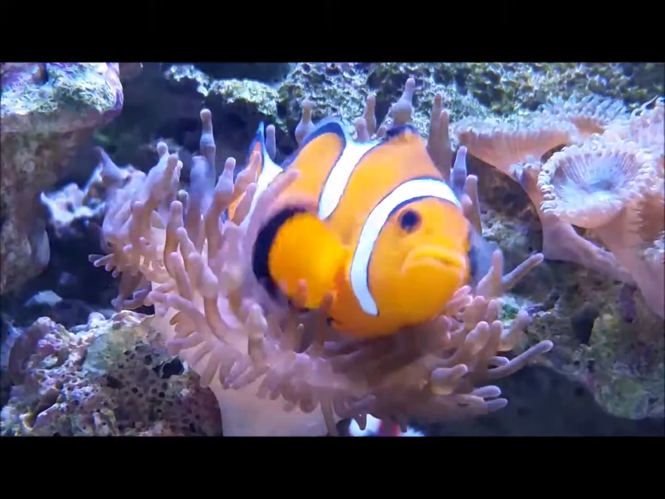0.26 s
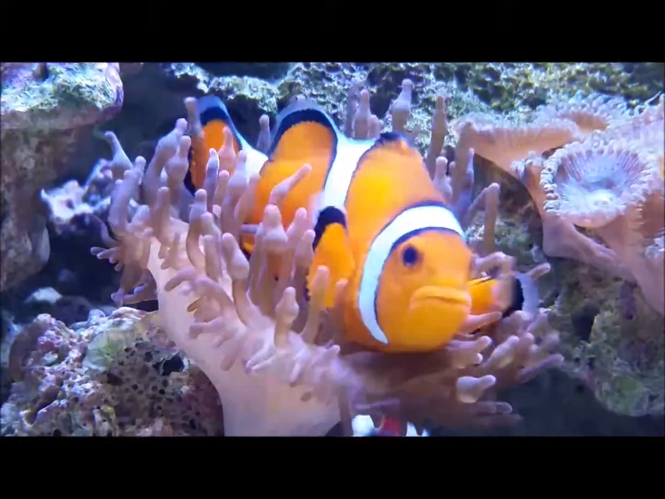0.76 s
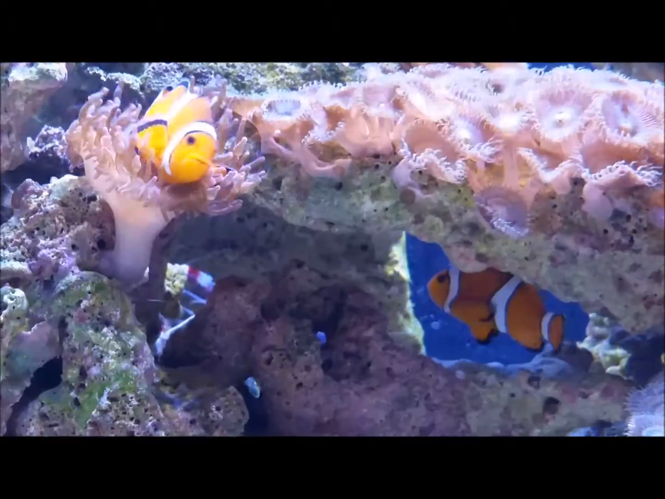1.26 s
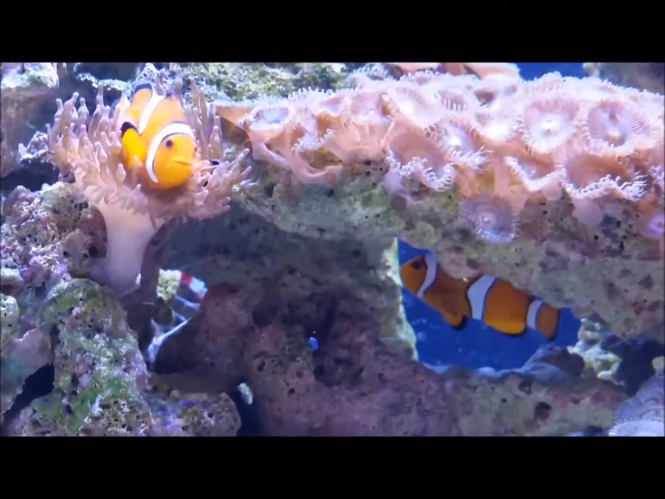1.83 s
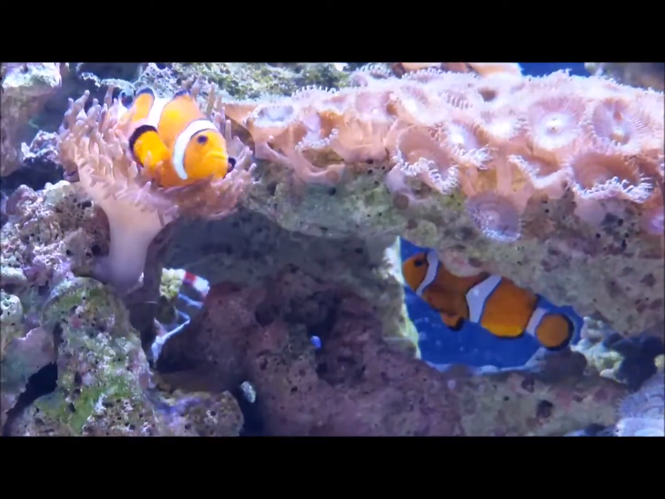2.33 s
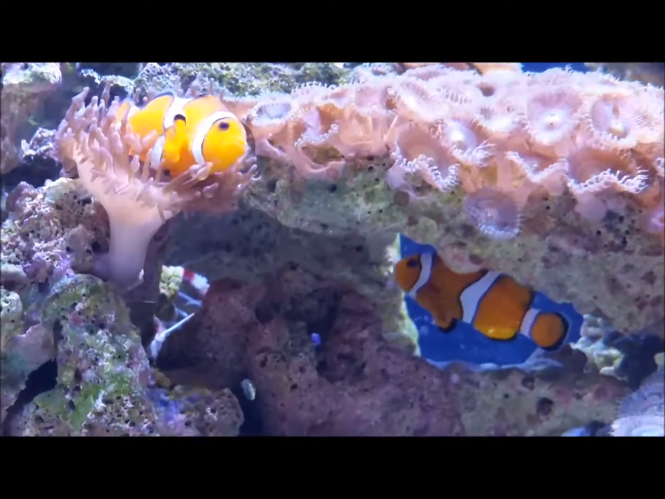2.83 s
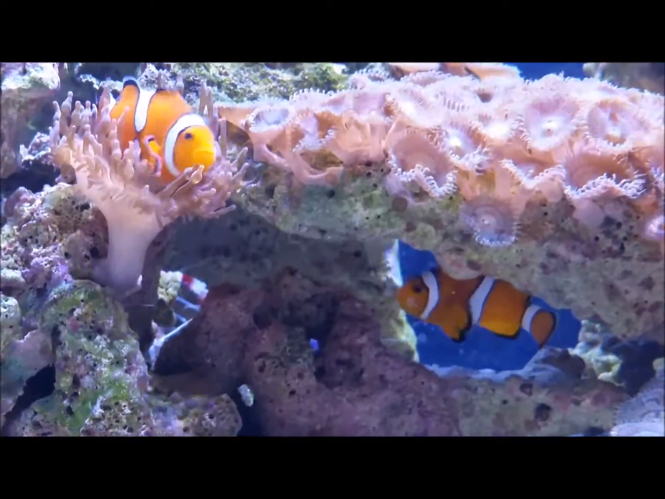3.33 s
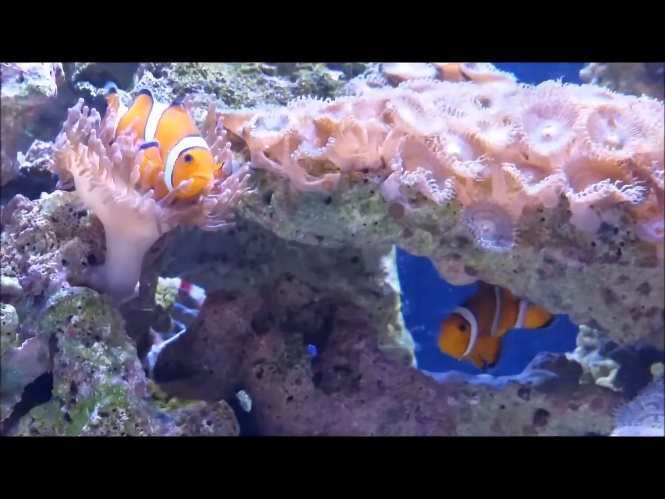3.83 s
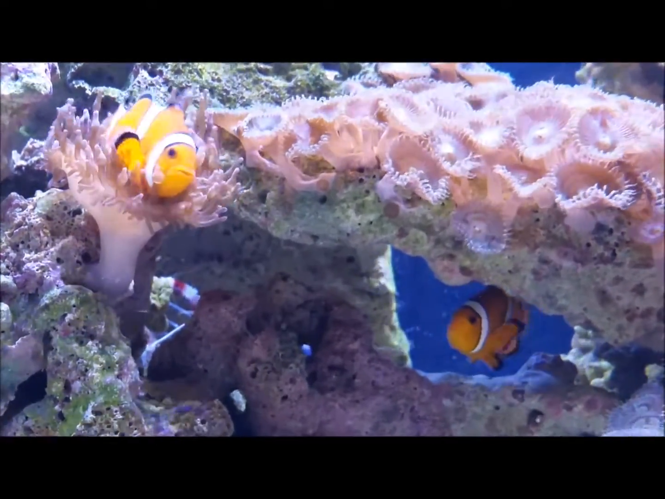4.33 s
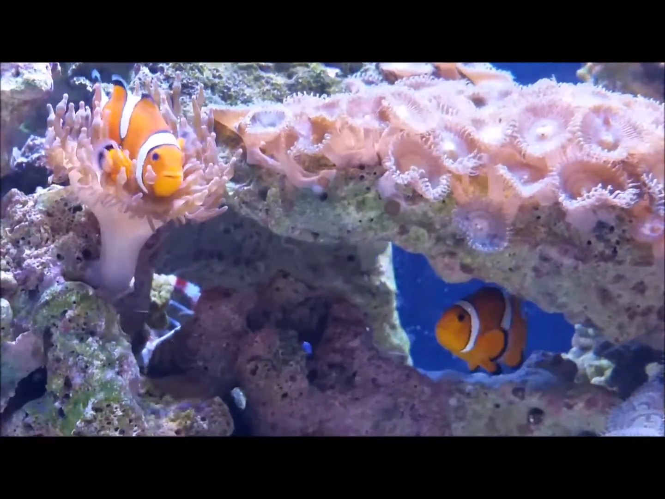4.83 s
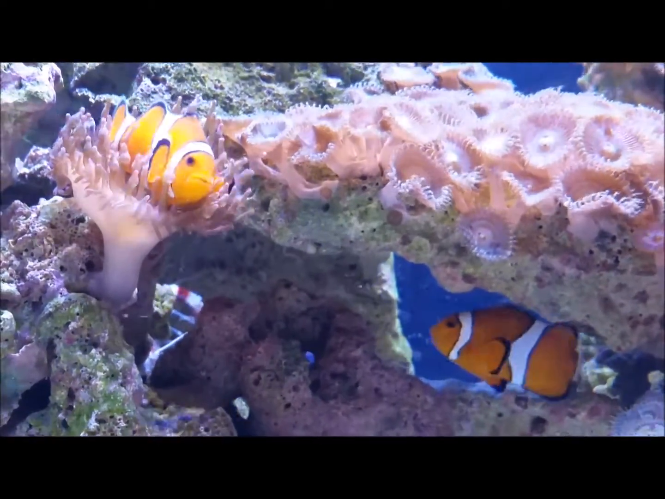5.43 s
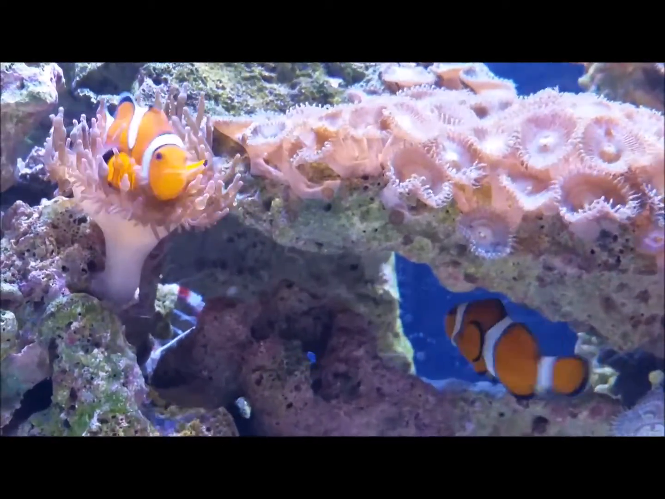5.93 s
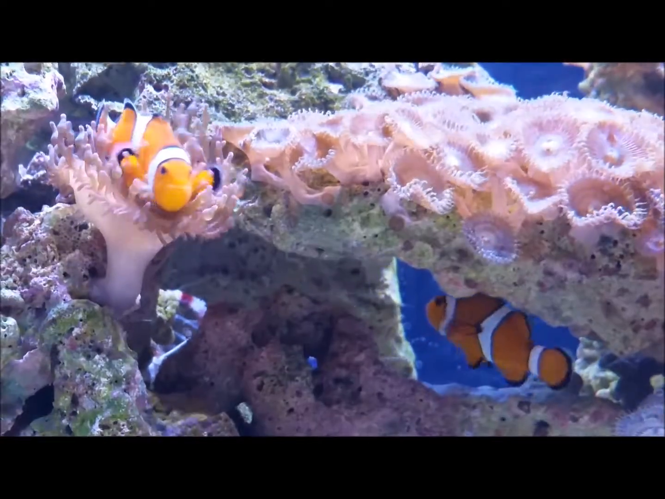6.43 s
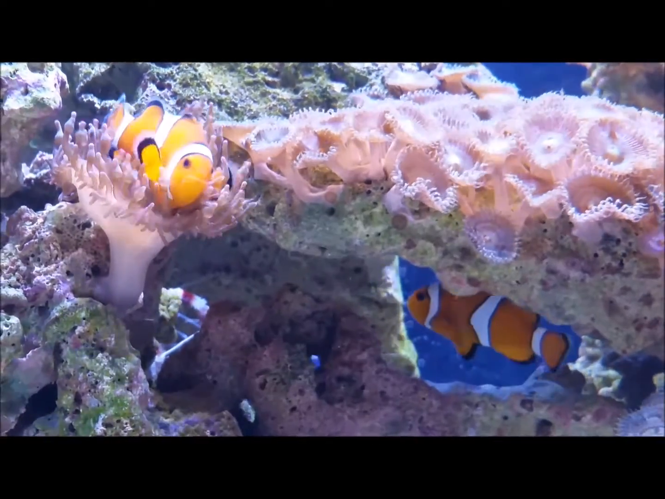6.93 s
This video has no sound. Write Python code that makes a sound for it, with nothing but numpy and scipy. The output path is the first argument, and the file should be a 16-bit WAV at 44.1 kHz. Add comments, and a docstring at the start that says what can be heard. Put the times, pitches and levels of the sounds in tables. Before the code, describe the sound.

Loud low electric pump hum with soft water plops near aquarium glass, then an abrupt drop to a quieter drone with trickling and faint knocks.

```python
"""A reef tank's pump hums indoors: loud close to the glass, then after a hard cut a quiet drone further back.
The hum is a sum of harmonics of the mains; water and air rumble as noise coloured by cabinet and room.
The overflow trickles and surges down its drain as noise shaped by the pipe's air, with pinging bubbles.
Water plops softly near the glass as gliding tones, and resonances swell for a moment now and then.
Damped rings make dry ticks, knocks and a soft bump on the cabinet; filtered noise is the microphone's hiss."""
import sys
import numpy as np
from scipy import signal
from scipy.fft import rfft, irfft
from scipy.io import wavfile
from scipy.ndimage import uniform_filter1d

SR = 44100
rng = np.random.default_rng(int(sys.argv[2]) if len(sys.argv) > 2 else 0)


def output_pcm(signal):
    """Save a mono or channel-first signal as 16-bit PCM at the path in sys.argv[1].

    Samples are clipped to [-1, 1] before scaling.
    """
    pcm = np.clip(np.atleast_2d(signal).T, -1, 1) * 32767
    wavfile.write(sys.argv[1], SR, np.round(pcm).astype(np.int16))


N = 316638
TIME = np.arange(N) / SR  # s
HZ = np.fft.rfftfreq(N, 1 / SR)
CUT_S = 1.107  # the close position ends here
MAINS_HZ = 59.995


def gain_of(db):
    """Logarithmic level: decibels to amplitude."""
    return 10 ** (np.asarray(db) / 20)


def read(points, hz):
    """Logarithmic pitch scale: joins (Hz, value) points by straight lines over log frequency."""
    point_hz, value = np.transpose(points)
    return np.interp(np.log(hz + 1), np.log(point_hz + 1), value)


def sides(lean_db):
    """Level difference: gains of the left and right ports, lean_db apart."""
    return gain_of([[lean_db / 2], [-lean_db / 2]])


def drift(per_s):
    """Low-passed chance: a slow random curve of rms 1, changing up to about per_s times a second."""
    low_pass = np.exp(-(HZ / per_s) ** 2)
    slow = irfft(rfft(rng.standard_normal(N)) * low_pass, N)
    return (slow - slow.mean()) / slow.std()


def port_noise(density_db, lean_db, same):
    """Partial coherence: noise at two ports with a given spectrum, left-right balance and likeness."""
    left, other = rfft(rng.standard_normal((2, N)))
    same = np.clip(same, -1, 1)
    right = same * left + np.sqrt(1 - same ** 2) * other
    balance = gain_of([lean_db / 2, -lean_db / 2])
    balance /= np.sqrt(np.mean(balance ** 2, axis=0))  # keeps the mean power of the two ports
    pair = np.array([left, right]) * balance * gain_of(density_db)
    return irfft(pair, N) * np.sqrt(SR / 2)  # density is per Hz


def lifted(spectrum, rings):
    """Resonance: a smooth spectrum in dB, raised in power around each resonant frequency."""
    lift = 1
    for centre_hz, width_hz, db in rings:
        lift = lift + (gain_of(db) ** 2 - 1) / (1 + (2 * (HZ - centre_hz) / width_hz) ** 2) ** 2
    return read(spectrum, HZ) + 10 * np.log10(np.maximum(lift, 0.1))


def patchy(pair, depth_db):
    """Uneven flow: one narrow band after another is lifted, each for a tenth of a second or so."""
    frames = signal.stft(pair, nperseg=1024, noverlap=768)[2]
    patches = rng.standard_normal(frames.shape[1:])
    patches = uniform_filter1d(patches, size=5, axis=0)  # over frequency
    patches = uniform_filter1d(patches, size=16, axis=1)  # over time
    uneven = frames * gain_of(depth_db * patches / patches.std())
    return signal.istft(uneven, nperseg=1024, noverlap=768)[1][:, :N]


# Harmonics of the pump's hum, from the mains frequency itself upwards.
# Each row: left rms level in dB, right rms level in dB, phase by which the left leads in radians.
NEAR_HARMONICS = [(-41.5, -48, -1.2), (-22.5, -36, 0.7), (-55.5, -59, 6.5), (-66, -51.5, 0.5),
                  (-61, -64, 0.2), (-52.5, -55.5, 2), (-69.5, -79.5, 0.5), (-56, -65, -1.5)]
FAR_HARMONICS = [(-89.5, -74.5, 0.034), (-43, -43, 0.092), (-63, -64.5, -0.005), (-60, -59.5, -0.14),
                 (-73, -81, -0.099), (-66.5, -70.5, -0.13)]


def hum(harmonics, crest_s, waver_db):
    """Magnetic pull: it peaks twice in each mains cycle, so the second multiple leads; the load wavers."""
    angle = 2 * np.pi * MAINS_HZ * (TIME - crest_s)
    out = np.zeros((2, N))
    for k, (left_db, right_db, lead) in enumerate(harmonics, 1):
        left = gain_of(left_db) * np.cos(k * angle)
        right = gain_of(right_db) * np.cos(k * angle - lead)
        waver = gain_of(waver_db * np.sqrt(k) * drift(3.2))
        out += np.sqrt(2) * np.array([left, right]) * waver  # sqrt(2) turns rms into peak
    return out


# Smooth spectrum of the rumble, before resonances. Each row: frequency in Hz, density in dB per Hz.
NEAR_RUMBLE = [(12, -80.5), (30, -65), (50, -64.5), (74, -61.5), (95, -58), (112, -60), (140, -63),
               (200, -63.5), (290, -66), (340, -66.5), (420, -77), (530, -89), (800, -86), (1200, -89.5),
               (1500, -92), (2050, -106), (3000, -112)]
FAR_RUMBLE = [(12, -88.5), (27, -75.5), (34, -78.5), (42, -69.5), (80, -70.5), (108, -72), (132, -68),
              (210, -67), (260, -73.5), (310, -74), (347, -79), (385, -80.5), (470, -83), (610, -90),
              (800, -89), (1200, -94.5), (2100, -112)]
# Resonances of cabinet and room. Each row: frequency in Hz, width in Hz, lift in dB.
NEAR_RESONANCES = [(94, 18, 0.5), (165, 9.5, 8.5), (192, 32, 7.5), (459, 44, 4), (639, 110, 9),
                   (1078, 47, 8.5), (1353, 200, 10)]
FAR_RESONANCES = [(41.7, 4.6, 5.6), (89, 9.7, 7.6), (164.8, 12.6, 8.4), (202.5, 23.7, 5.85),
                  (238.8, 12, 4.8), (318, 14.6, 6.9), (362.3, 13, 5), (1297, 32, 10), (1280, 80, 2.4)]
# Balance of the rumble at the two ports. Each row: frequency in Hz, left minus right in dB.
NEAR_BALANCE = [(40, 7), (100, 13), (150, 4.7), (200, 5), (380, 0.5), (700, 2), (1300, 0.5), (2400, 3.5)]
FAR_BALANCE = [(60, 0.5), (200, -1), (700, 0), (1050, 3), (1320, -6), (1550, 9), (2200, -10.5)]
# Likeness of the two ports, also used for the drain.
# Each row: frequency in Hz, left-right correlation (no unit, limited to -1..1 in use).
NEAR_LIKENESS = [(60, 0.98), (130, 1.2), (195, -0.23), (280, 0.33), (360, -0.74), (480, 1.2), (650, 0.73),
                 (900, 0.1), (1080, 0.1), (1330, -0.69), (1500, 0.41), (2200, -0.5)]
FAR_LIKENESS = [(60, 0.77), (130, 1), (290, 0.93), (400, 0.85), (640, 0.38), (1100, 0.21), (1280, -0.068),
                (1400, 0.024), (2200, -0.14)]


def flow(spectrum, rings, lean, same, waver_db, top_hz=3000):
    """Turbulence: steady noise of water and air, coloured by cabinet and room, with no treble."""
    roll_off_db = 10 * np.log10(1 + (HZ / top_hz) ** 12)
    density_db = lifted(spectrum, rings) - roll_off_db
    return port_noise(density_db, read(lean, HZ), read(same, HZ)) * gain_of(waver_db * drift(5.2))


# Surges of the overflow, singly or in pairs about once a second.
# Each row: crest in seconds, level in dB relative to the steady trickle before the tilt, length in seconds.
SURGE_CRESTS = [(0.028, 11.5, 0.051), (0.498, 12.5, 0.16), (1.358, 3, 0.15), (1.543, 7.5, 0.11),
                (2.324, 5, 0.08), (2.414, 7, 0.13), (3.668, 2, 0.1), (3.774, 5.5, 0.06), (4.557, 0, 0.1),
                (4.717, 6, 0.15), (4.871, 0.5, 0.4), (5.642, 0.5, 0.28), (6.016, 1, 0.1), (6.435, 3, 0.11),
                (6.56, 4, 0.08)]
SURGE_RISE = 0.4  # share of a surge's length spent building up; the rest is draining away


def overflow():
    """Filling and draining: strength of the spill, each surge building to its crest, then decaying."""
    power = np.zeros(N)
    for crest_s, db, length_s in SURGE_CRESTS:
        age = (TIME - crest_s) / length_s
        fade = np.where(age < 0, (age / SURGE_RISE) ** 2, age / (1 - SURGE_RISE))
        power += gain_of(db) ** 2 * np.exp(-fade)
    return np.sqrt(power)


# Spectral shape of the wash in the drain. Each row: frequency in Hz, relative density in dB.
NEAR_WASH_SHAPE = [(300, -36.5), (700, -7.5), (1200, -0.5), (1430, 3), (1580, -7), (1780, -6.5),
                   (1950, -20.5), (2450, -23.5), (4000, -66.5)]
FAR_WASH_SHAPE = [(300, -23), (900, -12.5), (1300, 5.5), (1550, 2.5), (1850, 1), (2000, -3.5), (2450, -6),
                  (2650, -23.5), (4000, -59)]
# Resonances of the air in the pipe. Each row: frequency in Hz, width in Hz, lift in dB.
PIPE_RESONANCES = [(1292, 16, 6), (1350, 35, 7), (1436, 22, 5), (1626, 20, 3), (1697, 22, 7), (1728, 18, 4),
                   (1786, 18, 5), (1862, 25, 4), (2082, 20, 5), (2150, 22, 4), (2208, 20, 6), (2358, 20, 5)]
# Course of the drain's steady trickle. Each row: time in seconds, relative level in dB.
TRICKLE_LEVEL = [(1.0, -1), (1.2, -2.5), (1.55, 0.5), (2.75, 1.5), (3.05, -2), (3.5, -0.5), (3.95, 3),
                 (4.25, 0.5), (4.7, 1.5), (5.55, 2), (6.2, 0.5), (6.9, 1.5), (7.18, 2)]
SURGE_BRIGHT_DB, SURGE_PIVOT_HZ = 4.5, 1650  # dB per octave by which surges are brighter; pivot of the tilt


def drain(spectrum, same, level_db, lean_db, burble_db):
    """Pipe resonance: an uneven trickle excites the air in the pipe, and surges add a brighter wash."""
    colour_db = lifted(spectrum, PIPE_RESONANCES)
    balance_db = np.full(len(HZ), lean_db)
    likeness = read(same, HZ)
    tilt_db = SURGE_BRIGHT_DB * np.log2((HZ + 1) / SURGE_PIVOT_HZ)
    trickle = port_noise(colour_db, balance_db, likeness)
    spill = port_noise(colour_db + tilt_db, balance_db, likeness)
    steady = gain_of(np.interp(TIME, *np.transpose(TRICKLE_LEVEL)))
    wash = (steady * trickle + overflow() * spill) / trickle.std()
    return patchy(wash, depth_db=1.5) * gain_of(level_db + burble_db * drift(26))


def bubbles(busy, peak_db, spread_db, centre_hz, scatter_hz, decay_s, count):
    """Bubble resonance: decaying pings at random, denser where busy, out of step at the two ports."""
    out = np.zeros((2, N))
    t = np.arange(4096) / SR
    due = np.cumsum(busy) / np.sum(busy)
    chances = rng.random((count, 3))
    traits = rng.standard_normal((count, 2))
    for (when, left, right), (size, pitch) in zip(chances, traits):
        turns = (centre_hz + scatter_hz * pitch) * t + np.array([[left], [right]])
        onset = np.minimum(10 * t / decay_s, 1)
        envelope = gain_of(peak_db + spread_db * np.minimum(size, 1)) * np.exp(-t / decay_s) * onset
        part = out[:, np.searchsorted(due, when):][:, :len(t)]
        part += (envelope * np.sin(2 * np.pi * turns))[:, :part.shape[1]]
    return out


def gurgle():
    """Size sets pitch: large bubbles ping throughout; after the cut, surges bring sprays of smaller ones."""
    large = bubbles(np.ones(N), peak_db=-63.0, spread_db=4, centre_hz=1315, scatter_hz=38,
                    decay_s=0.018, count=110)
    small = bubbles(overflow() ** 2 * (TIME > CUT_S), peak_db=-65.0, spread_db=5, centre_hz=1953,
                    scatter_hz=250, decay_s=0.008, count=110)
    return large + small


# Spectrum of the microphone's hiss and of the fine fizz above it.
# Each row: frequency in Hz, density in dB per Hz.
HISS_SPECTRUM = [(1500, -125), (2600, -110), (3100, -95.5), (3600, -90.5), (4200, -95.5), (5000, -112),
                 (5700, -115.5), (6500, -122), (8500, -133)]
FIZZ_SPECTRUM = [(6000, -135), (8800, -129), (10500, -113.5), (12200, -111.5), (15500, -113)]
# Balance of both. Each row: frequency in Hz, left minus right in dB.
HISS_BALANCE = [(2500, -4.5), (3200, 12.5), (4400, 7), (6000, -3), (10000, 0)]


def hiss(near_hiss_db=1.64, near_fizz_db=-2.5):
    """Incoherent noise: each port hisses alone, the left with a broad resonance; the treble flickers."""
    close = TIME < CUT_S
    lean_db = read(HISS_BALANCE, HZ)
    waver_db = 0.3 * drift(5)
    flicker_db = 0.75 * drift(9)
    body = port_noise(read(HISS_SPECTRUM, HZ), lean_db, 0) * gain_of(near_hiss_db * close + waver_db)
    fizz = port_noise(read(FIZZ_SPECTRUM, HZ), lean_db, 0) * gain_of(near_fizz_db * close + flicker_db)
    return body + fizz


# Gurgles and hollow swells of the flow.
# Each row: centre in seconds, length in seconds, frequency in Hz, width in Hz, rms level in dB.
FLOW_SWELLS = [(0.034, 0.056, 1340, 170, -52), (0.495, 0.05, 1366, 68, -56.5),
               (0.867, 0.027, 1450, 70, -58.5), (1.058, 0.067, 342, 41, -44), (1.64, 0.11, 1320, 50, -65),
               (2.186, 0.19, 1340, 64, -65), (4.723, 0.11, 1280, 100, -65), (5.0, 0.48, 361, 8, -56),
               (5.03, 0.1, 1336, 50, -64.5), (5.3, 0.086, 480, 70, -56), (5.53, 0.3, 358, 8.7, -58),
               (5.527, 0.1, 1304, 50, -66), (6.194, 0.08, 476, 45, -63), (6.197, 0.22, 361.5, 8, -53),
               (6.44, 0.07, 1695, 41, -66), (6.52, 0.1, 1283, 58, -61.5), (6.58, 0.069, 490, 42, -67.5),
               (6.84, 0.14, 535, 54, -56.5), (7.07, 0.39, 498, 88, -60.5), (7.137, 0.33, 1330, 50, -68)]


def swells():
    """Selective resonance: now and then one narrow band of the flow stands out for a moment."""
    out = np.zeros(N)
    for centre_s, length_s, hz, width_hz, db in FLOW_SWELLS:
        band_pass = np.exp(-((HZ - hz) / width_hz) ** 2)
        band = irfft(rfft(rng.standard_normal(N)) * band_pass, N)
        bump = np.exp(-(2 * (TIME - centre_s) / length_s) ** 2)
        rms = np.sqrt(np.average(band ** 2, weights=bump))
        out += gain_of(db) * bump * band / rms
    return out


# Water plops, with one deeper gulp among them.
# Each row: start in seconds, peak level in dB before the lean, closing pitch in Hz, length in seconds.
WATER_PLOPS = [(0.14, -51, 640, 0.016), (0.183, -49.5, 650, 0.017), (0.328, -45.5, 660, 0.024),
               (0.525, -48, 760, 0.016), (0.557, -53, 730, 0.014), (0.605, -48, 640, 0.02),
               (0.731, -45, 615, 0.018), (0.7675, -42, 615, 0.017), (0.894, -44, 652, 0.0256),
               (0.932, -54, 816, 0.016), (0.951, -52, 620, 0.012), (1.017, -41, 332, 0.026),
               (1.023, -44, 612, 0.022)]


def plops(glide=0.27, settle_s=0.003, lean_db=2):
    """Air-pocket resonance: each pocket rings for about a dozen cycles and sinks in pitch as it opens."""
    out = np.zeros(N)
    for start_s, db, hz, length_s in WATER_PLOPS:
        t = np.arange(0, length_s, 1 / SR)
        pitch = hz * (1 + glide * np.exp(-t / settle_s))
        envelope = np.sin(np.pi * np.sqrt(t / length_s)) ** 2  # swells faster than it fades
        plop = gain_of(db) * envelope * np.sin(2 * np.pi * np.cumsum(pitch) / SR)
        out[round(start_s * SR):][:len(t)] += plop
    return out * sides(lean_db)


# Course of the rumble's boom further back. Each row: time in seconds, relative level in dB.
BOOM_LEVEL = [(1.2, -3.5), (1.45, -1), (2.0, -0.5), (2.3, 0.5), (2.7, 0), (3.2, -1), (3.5, 2.5), (3.8, 1),
              (4.2, -2), (4.55, 2.5), (5.0, 0), (5.3, 0), (5.5, -3), (5.8, -4.5), (6.35, 2.5), (6.55, 0),
              (6.85, 4.5), (7.18, -0.5)]


def heave(pair, centre_hz=195, width_hz=65, evenness=0.3):
    """Band modulation: the rumble's middle, partly evened out, swells and sinks while the rest holds steady."""
    band_pass = np.exp(-((HZ - centre_hz) / width_hz) ** 4)
    boom = irfft(rfft(pair) * band_pass, N)
    power = uniform_filter1d(uniform_filter1d((boom ** 2).mean(0), size=3500), size=3500)
    even = (power / power.mean()) ** (-np.clip(evenness, 0, 1) / 2)
    course = gain_of(np.interp(TIME, *np.transpose(BOOM_LEVEL)))
    return pair + boom * (even * course - 1)


# Small dry ticks and knocks, one at the bump on the cabinet. Each row: start in seconds,
# envelope peak in dB before the lean, frequency in Hz, decay in seconds, left minus right in dB.
TICKS = [(1.956, -56.5, 4900, 0.0004, 0), (3.4679, -46, 950, 0.00037, 13), (3.5553, -40, 860, 0.00044, -1),
         (7.1576, -42.5, 820, 0.0004, -1)]


def ticks():
    """Heavy damping: each ring builds up and is gone within a few cycles."""
    out = np.zeros((2, N))
    t = np.arange(512) / SR
    for start_s, db, hz, decay_s, lean_db in TICKS:
        envelope = t / decay_s * np.exp(1 - t / decay_s)  # peaks at 1 after decay_s
        tick = gain_of(db) * envelope * np.sin(2 * np.pi * hz * t)
        part = out[:, round(start_s * SR):][:, :len(t)]
        part += sides(lean_db) * tick[:part.shape[1]]
    return out


# Modes of the cabinet's panels.
# Each row: frequency in Hz, starting level in dB, time to fall by 60 dB in seconds.
PANEL_MODES = [(320, -49, 0.095), (413, -43, 0.08), (770, -63, 0.11), (920, -66, 0.05), (1310, -63, 0.25)]
KNOCK_S = 3.549  # moment of the bump


def knock(rise_s=0.0044):
    """Modal decay: a soft bump sets the cabinet's panels ringing briefly."""
    age = np.maximum(TIME - KNOCK_S, 0)
    ring = np.zeros(N)
    for hz, db, t60_s in PANEL_MODES:
        ring += gain_of(db - 60 * age / t60_s) * np.sin(2 * np.pi * hz * age)
    return ring * np.minimum(age / rise_s, 1)


def scene(handover_s=0.0024):
    """Superposition: all sources add; at the cut the hum's second multiple jumps crest to trough and clicks."""
    far_crest_s = CUT_S + 1 / (4 * MAINS_HZ)  # a quarter cycle late puts the second multiple in a trough
    near_hum = hum(NEAR_HARMONICS, CUT_S, waver_db=0.2)
    far_hum = hum(FAR_HARMONICS, far_crest_s, waver_db=0.57)
    pump = np.where(TIME < CUT_S, near_hum, far_hum)

    near = flow(NEAR_RUMBLE, NEAR_RESONANCES, NEAR_BALANCE, NEAR_LIKENESS, waver_db=-1.3)
    near += drain(NEAR_WASH_SHAPE, NEAR_LIKENESS, level_db=-61, lean_db=-5.0, burble_db=1.5)

    far_flow = flow(FAR_RUMBLE, FAR_RESONANCES, FAR_BALANCE, FAR_LIKENESS, waver_db=0.6)
    far = heave(patchy(far_flow, depth_db=1.0))
    far += drain(FAR_WASH_SHAPE, FAR_LIKENESS, level_db=-67.5, lean_db=-2.5, burble_db=1.3)

    # the water noise changes over in a few milliseconds
    distant = np.clip((TIME - CUT_S) / handover_s + 0.5, 0, 1)
    water = (1 - distant) * near + distant * far
    return pump + water + gurgle() + hiss() + swells() + plops() + ticks() + knock()


EDGE_HZ = 15750  # upper edge of the band


def record(dry):
    """Band limiting: a linear-phase low-pass filter removes what lies above the edge."""
    low_pass = signal.firwin(511, EDGE_HZ, window=("kaiser", 9), fs=SR)
    return signal.oaconvolve(dry, low_pass[None], "same")


dry = scene()
out = record(dry)
output_pcm(out)
```